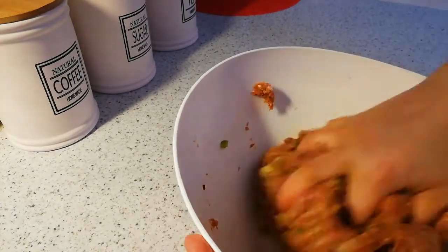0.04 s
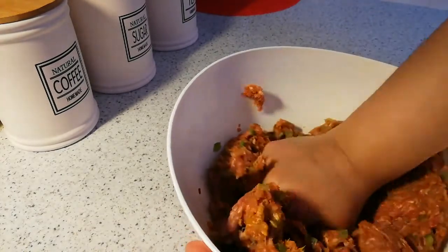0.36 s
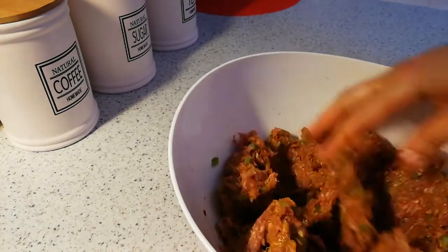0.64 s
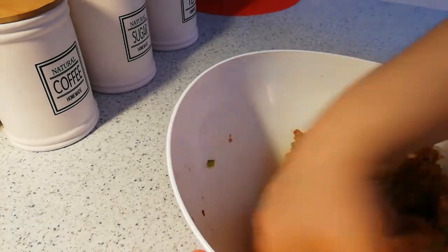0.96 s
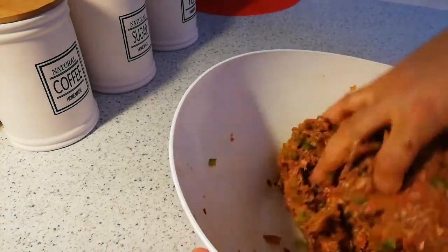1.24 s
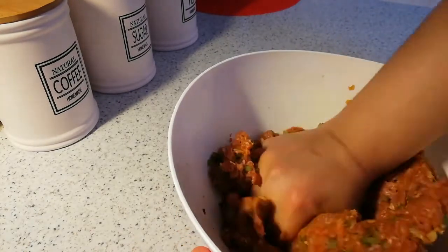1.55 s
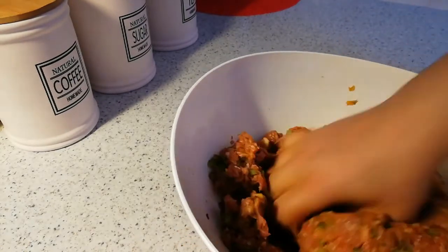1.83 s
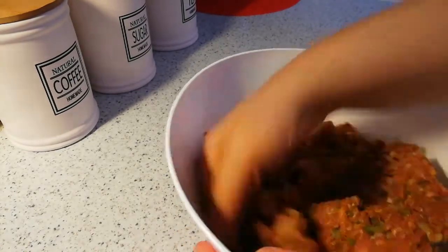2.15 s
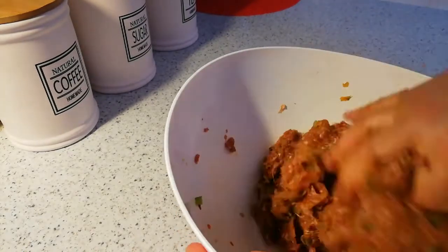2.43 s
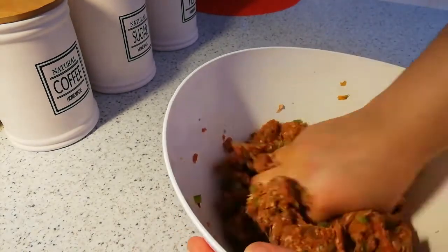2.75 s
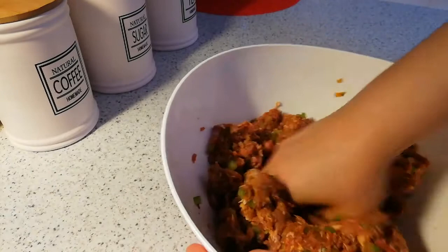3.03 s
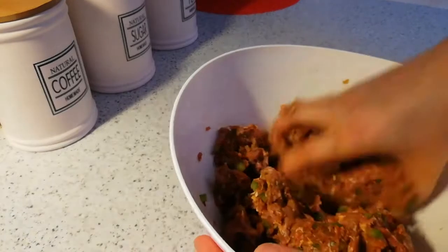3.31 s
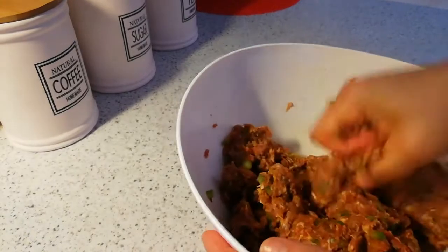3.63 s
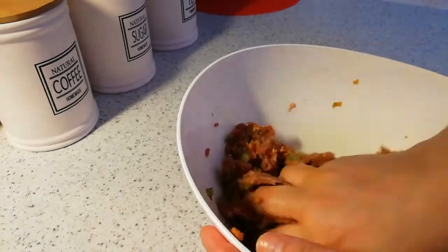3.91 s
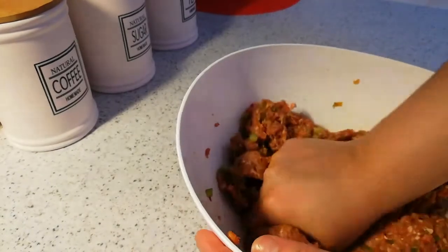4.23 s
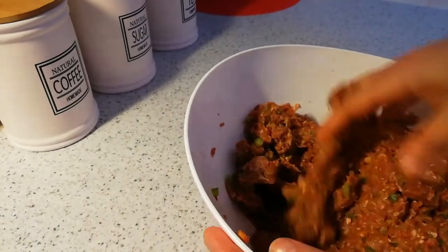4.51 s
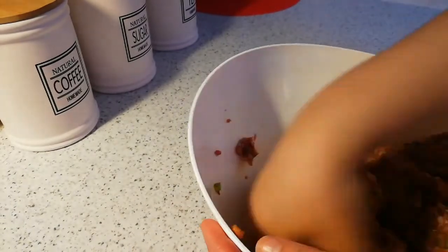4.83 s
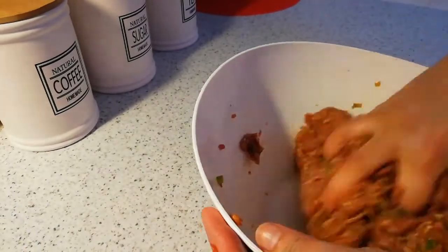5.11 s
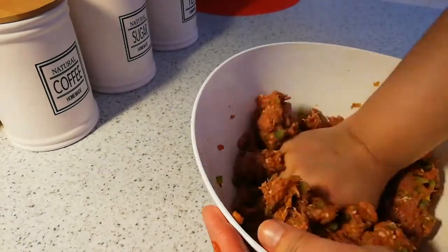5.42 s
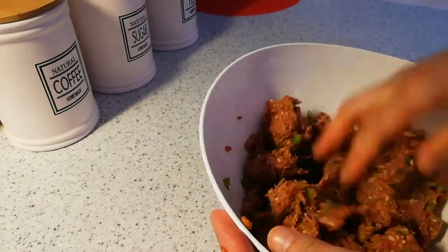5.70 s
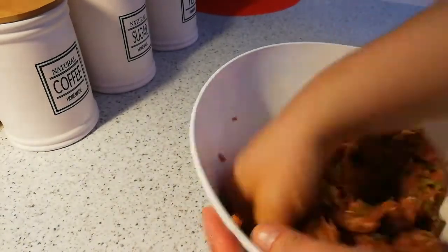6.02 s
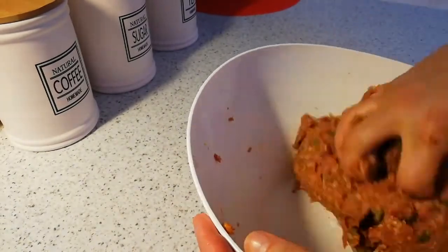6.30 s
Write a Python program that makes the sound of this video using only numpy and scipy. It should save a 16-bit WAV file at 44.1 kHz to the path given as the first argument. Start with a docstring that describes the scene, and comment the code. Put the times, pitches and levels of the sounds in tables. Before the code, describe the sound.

Close, crackly squishing and small wet pops of mince being mixed by hand, with a plastic bowl knocking and rattling against the counter.

```python
"""A small hard kitchen, the microphone close to a plastic bowl of minced meat on the counter.
Over a low steady rumble a hand kneads from the start: each squeeze fizzes and snaps as sticky films tear,
and bumps the bowl dully. From 0.4 s pushes tip the bowl, which knocks and rattles on the counter.
From 1.1 s suction lets go in small pops; from 3.4 s trapped air squelches out as well.
The kneading goes on to the end, the kitchen answering each knock with a short tail."""
import sys
import numpy as np
from scipy import signal
from scipy.fft import rfft, irfft, next_fast_len
from scipy.io import wavfile
from scipy.ndimage import uniform_filter1d, map_coordinates

SR = 44100
rng = np.random.default_rng(int(sys.argv[2]) if len(sys.argv) > 2 else 0)


def wrap_up_sound(samples):
    """Save the sound to the file named by the first command line argument, as 16-bit audio."""
    columns = np.atleast_2d(samples).T
    # keep every value between -1 and 1, then stretch to whole-number steps
    tamed = np.clip(columns, -1, 1)
    steps = np.round(tamed * 32767).astype(np.int16)
    wavfile.write(sys.argv[1], SR, steps)


N = 284886


def amp(db):
    """Decibels to gain."""
    return 10 ** (np.asarray(db) / 20)


def unit(x):
    """Scale to rms 1."""
    return x / np.sqrt(np.mean(x ** 2) + 1e-20)


def along(points, hz):
    """Read a (frequency_hz, value) curve on a log frequency axis."""
    point_hz, values = np.transpose(points)
    return np.interp(np.log(hz + 1), np.log(point_hz + 1), values)


def wobble(knots_per_s):
    """A smooth random curve."""
    knots = rng.standard_normal(int(N * knots_per_s / SR) + 4)
    return map_coordinates(knots, [np.arange(N) * knots_per_s / SR])


def filtered(x, response):
    """Filter x by a gain that is a function of frequency."""
    n = x.shape[-1]
    padded = next_fast_len(n + 8192)
    return irfft(rfft(x, padded) * response(np.fft.rfftfreq(padded, 1 / SR)), padded)[..., :n]


def coloured(x, spectrum):
    """Give x a (frequency_hz, gain_db) colour."""
    return filtered(x, lambda hz: amp(along(spectrum, hz)))


def add(track, start_s, sound):
    """Mix a stereo sound into track."""
    part = track[:, max(round(start_s * SR), 0):][:, :sound.shape[1]]
    part += sound[:, :part.shape[1]]


# How alike diffuse sound is at the microphone's left and right ports: frequency_hz, correlation
PORT_LIKENESS = [(100, 0.99), (250, 0.76), (600, 0.046), (3000, 0.16)]

def diffuse(size):
    """Noise from all round the microphone: alike in the bass, nearly unrelated in the treble."""
    def mid_side_gains(hz):
        angle = np.arccos(np.clip(along(PORT_LIKENESS, hz), -1, 1)) / 2
        return np.array([np.cos(angle), np.sin(angle)])
    mid, side = filtered(rng.standard_normal((2, size)), mid_side_gains)
    return np.array([mid + side, mid - side])


# The kitchen's reverberation: frequency_hz, t60_s
KITCHEN_DECAY = [(150, 0.5), (800, 0.42), (2000, 0.35), (5000, 0.71), (14000, 0.39)]

def path_to_mic(near_db, near_t60, room_db, lag_s=0.00023):
    """Bowl to microphone: the direct sound, a near scatter off jars and counter, the kitchen's tail."""
    t = np.arange(SR // 3) / SR
    near = diffuse(len(t)) * amp(-60 * t / near_t60) * (t > .0012)
    hz, frame_s, bands = signal.stft(diffuse(len(t)), SR, nperseg=256)
    bands = bands * amp(-60 * frame_s / along(KITCHEN_DECAY, hz)[:, None])
    tail = signal.istft(bands, SR, nperseg=256)[1][:, :len(t)] * (t > .006)
    response = (amp(near_db) * unit(near) + amp(room_db) * unit(tail)) / np.sqrt(len(t))
    response[0, round(lag_s * SR)] += 1  # the bowl stands to the right, so the left port hears it later
    response[1, 0] += 1
    return response


# The kitchen's background: frequency_hz, gain_db
ROOM_TONE_SPECTRUM = [(20, -1.5), (55, 1.5), (120, -2.5), (220, -11.5), (400, -17), (580, -18.5),
                      (1000, -38), (3000, -72), (16000, -21)]

def room_tone(level_db=-58):
    """A steady low rumble and faint hiss all round the microphone."""
    return amp(level_db) * unit(coloured(diffuse(N), ROOM_TONE_SPECTRUM))


# The hand gathers, presses and lets go: start_s, firmest_s, end_s, films_db, air_over_films_db
HAND_SQUEEZES = [(-0.04, 0.111, 0.28, -44, -10), (0.305, 0.352, 0.47, -43, -10),
                 (0.693, 0.782, 0.89, -48.5, -5.5), (0.903, 1.034, 1.16, -52.5, -15),
                 (1.244, 1.43, 1.592, -44.5, -14.5), (1.641, 1.678, 1.808, -43.5, -5),
                 (2.016, 2.087, 2.2, -49, -10), (2.3, 2.469, 2.46, -55, -21), (2.506, 2.752, 2.86, -45, -9),
                 (2.919, 2.978, 3.055, -42, -11), (3.276, 3.423, 3.576, -43, -11),
                 (3.62, 3.66, 3.8, -47.5, -8.5), (3.862, 3.978, 4.057, -46, -5),
                 (4.084, 4.101, 4.14, -46, -6.5), (4.187, 4.285, 4.366, -45, -28),
                 (4.397, 4.46, 4.49, -58.5, -22), (4.57, 4.69, 4.76, -51, -2), (4.8, 4.87, 4.96, -51.5, -1),
                 (4.96, 5.105, 5.13, -51.5, -14), (5.122, 5.22, 5.35, -44.5, -23),
                 (5.475, 5.503, 5.6, -41.5, -7), (5.842, 5.903, 6.027, -48, -7),
                 (6.084, 6.12, 6.26, -47, -13), (6.273, 6.47, 6.38, -48.5, -9.5)]

def squeezing(swell_db=8, ease_db=6.5, roundness=1.37, grip_db_per_s=319, release_db_per_s=277):
    """Levels in dB of tearing films and escaping air as the hand grips, presses, eases and lets go."""
    t = np.arange(N) / SR
    films_power, air_power = amp(-68) ** 2, amp(-71.5) ** 2  # the meat settling between squeezes
    for start_s, firmest_s, end_s, films_db, air_over_films_db in HAND_SQUEEZES:
        early = np.clip((firmest_s - t) / max(firmest_s - start_s, 1 / SR), 0, 1)
        late = np.clip((t - firmest_s) / max(end_s - firmest_s, 1 / SR), 0, 1)
        level_db = films_db - swell_db * early ** roundness - ease_db * late ** roundness
        level_db -= grip_db_per_s * np.maximum(start_s - t, 0)
        level_db -= release_db_per_s * np.maximum(t - end_s, 0)
        films_power += amp(level_db) ** 2
        air_power += amp(level_db + air_over_films_db) ** 2
    return 10 * np.log10(films_power), 10 * np.log10(air_power)


def crackle(spectrum, per_s, spread_db, wash_db):
    """Tiny ruptures at random moments and spots; their echoes off the bowl merge into a wash."""
    when, spot, sign = rng.random((3, int(per_s * N / SR)))
    size = amp(spread_db * np.clip(rng.standard_normal(len(when)), -3, 3)) * np.sign(sign - .5)
    lag_s = .0008 * spot  # each spot has its own delay between the ports
    direct = np.array([np.bincount((when * N + s * SR).astype(int), size, N)[:N] for s in (lag_s, 0)])
    echo_power = signal.lfilter([1], [1, -np.exp(-1 / (0.013 * SR))], direct[1] ** 2)
    wash = np.sqrt(echo_power) * diffuse(N)
    return unit(coloured(unit(direct) + amp(wash_db) * unit(wash), spectrum))


def patchy(x, depth_db):
    """Small random patches of the fizz's spectrum swell and fade, giving it an uneven, mottled colour."""
    bands = signal.stft(x, nperseg=256)[2]
    patches = uniform_filter1d(rng.standard_normal(bands.shape[1:]), size=4, axis=0)  # across frequency
    patches = uniform_filter1d(patches, size=6, axis=1)  # across time
    gain = amp(depth_db * np.clip(unit(patches), -2, 2))
    return unit(signal.istft(bands * gain, nperseg=256)[1][:, :N])


# The bright fizz of wet films, heard close: frequency_hz, gain_db
FILM_SPECTRUM = [(300, -38), (550, -26), (900, -7.5), (1700, -2), (3000, 0.5), (6000, -2), (9000, -1),
                 (16000, -1)]
# The duller crackle of air pockets: frequency_hz, gain_db
POCKET_SPECTRUM = [(300, -10), (650, -14), (880, -5.5), (1150, -2), (1400, -5), (1700, -4.5), (3000, -23)]

def meat_fizz(tearing_db, air_db):
    """Squeezing tears wet films in clumps and presses air out of pockets."""
    clumps = amp(tearing_db + 1.7 * wobble(50) + 0.73 * wobble(350))
    films = crackle(FILM_SPECTRUM, per_s=3200, spread_db=3.5, wash_db=1.5)
    films = patchy(films, depth_db=2.4)
    pockets = crackle(POCKET_SPECTRUM, per_s=2000, spread_db=3, wash_db=0) * amp(2 * wobble(35))
    return clumps * films + amp(air_db) * pockets


def struck_bowl(modes, path, attack_s):
    """A blow rings the modes at fresh strengths; heard along path, rms 1 over the first 30 ms."""
    t = np.arange(SR // 5) / SR
    hz, db, t60 = np.transpose(modes)[:, :, None]
    detune, strength_db = rng.standard_normal((2, len(modes), 1))
    hz = hz * (1 + .01 * detune)  # the meat shifts its weight between blows
    ring = np.sum(amp(db + strength_db - 60 * t / t60) * np.sin(2 * np.pi * hz * t), axis=0)
    bass_cut = signal.butter(2, .7 * hz.min(), "high", fs=SR)  # little radiates below the lowest mode
    ring = signal.lfilter(*bass_cut, ring * (1 - np.exp(-t / attack_s)))
    heard = signal.fftconvolve(ring[None], path, axes=1)
    return heard / np.sqrt(np.mean(heard[:, :round(.03 * SR)] ** 2))


# The loaded bowl bouncing on its foot: pitch_hz, gain_db, t60_s
FOOT_MODES = [(140, -10.5, 0.11), (204, 8, 0.022), (224.2, -7, 0.12), (288, -8, 0.04)]
# A lump of meat flops onto the bowl's floor: start_s, level_db
MEAT_FLOPS = [(0.813, -49.5), (0.841, -51), (2.471, -57), (3.176, -41), (4.558, -48.5), (5.965, -39.5)]

def thuds(press_over_films_db=-21):
    """Flopping meat and the firmest moment of each squeeze softly bounce the bowl on its foot."""
    out = np.zeros((2, N))
    presses = [(firmest_s, db + press_over_films_db) for _, firmest_s, _, db, _ in HAND_SQUEEZES]
    for start_s, level_db in MEAT_FLOPS + presses:
        path = path_to_mic(near_db=1.5, near_t60=0.12, room_db=-5.5)
        add(out, start_s, amp(level_db) * struck_bowl(FOOT_MODES, path, attack_s=0.0039))
    return out


# A snap heard close: frequency_hz, gain_db
SNAP_SPECTRUM = [(500, -23), (1500, -4.5), (4000, -7.5), (9000, -2.5), (16000, 1.5)]

def snap(t60, spray_db, spray_t60):
    """A sharp, bright spit with a brief spray after it."""
    t = np.arange(SR // 12) / SR
    envelope = amp(-60 * t / t60) + amp(spray_db - 60 * t / spray_t60)
    return envelope * unit(coloured(rng.standard_normal((2, len(t))), SNAP_SPECTRUM))


# The loudest snaps of sticky meat off skin and plastic: start_s, level_db (before trim_db)
LOUD_SMACKS = [(0.2492, -33), (0.252, -30), (0.338, -28), (1.501, -28.5), (1.509, -27.5), (1.545, -28),
               (2.7953, -34.5), (2.918, -38), (2.9745, -30), (2.9946, -32.5), (3.3077, -30), (3.4651, -32),
               (4.052, -44), (4.105, -46), (5.152, -35.5), (5.335, -39.5)]

def smacks(tearing_db, trim_db=3, lesser_per_s=9, lift_db=5, scatter_db=2.5):
    """Films snap: a few loud ones, and lesser ones at random that follow the squeeze's strength."""
    out = np.zeros((2, N))
    lesser = [(when * N / SR, tearing_db[int(when * N)] + lift_db + scatter_db * (2 * strength - 1))
              for when, strength in rng.random((int(lesser_per_s * N / SR), 2))]
    for start_s, level_db in LOUD_SMACKS + lesser:
        add(out, start_s, amp(level_db + trim_db) * snap(t60=0.0046, spray_db=-11, spray_t60=0.078))
    return out


def base_slap(hz, lag_s=0.00073):
    """The bowl's base claps out the air under it in a single cycle; peak 1, later at the left port."""
    t = np.arange(SR // 100) / SR - np.array([[lag_s], [0]])
    phase = 2 * np.pi * hz * t - np.pi
    return -phase * np.exp((1 - phase ** 2) / 2)


# The bowl meets the counter; a harder landing is higher in pitch:
# start_s, clack_db, rim_over_clack_db, pitch_hz, rebounds
BOWL_LANDINGS = [(0.433, -26.5, -9, 716, False), (0.621, -46.5, 6.5, 600, True),
                 (0.693, -49, 5.5, 600, False), (0.741, -49, -7, 410, False),
                 (1.757, -29.5, -9, 718, False), (1.933, -58.5, 1, 760, False),
                 (1.948, -53, 10, 806.4, True), (2.005, -49.5, 9.5, 530, False),
                 (2.108, -40.5, 1, 850, False), (3.078, -31.5, -7.5, 576, False),
                 (3.146, -55, 4, 700, False), (3.573, -34, -1, 536, False), (3.633, -34, -13, 493.5, False),
                 (3.771, -52, 8, 860, False), (3.837, -31, -8.5, 497, False),
                 (4.515, -55.5, 11, 800, False), (4.702, -37.5, -9, 594, False),
                 (4.721, -54, 6, 770, False), (4.751, -28.5, -12, 560, False),
                 (4.942, -37, -14.5, 520, False), (5.614, -24, -8.5, 890, False),
                 (5.778, -51, 4, 660, False), (5.79, -45.5, 3, 773, False),
                 (5.829, -48.5, 6.5, 726.3, False), (5.928, -48, -2, 446, False),
                 (5.965, -38.5, -17, 445, False), (6.013, -41.5, -13, 635, True)]

def contacts(rebound_s=0.0165, loss_db=1.5):
    """Every touch of bowl on counter; a rocking bowl touches down a second time, more softly."""
    for start_s, clack_db, rim_over_clack_db, pitch_hz, rebounds in BOWL_LANDINGS:
        rim_db = clack_db + rim_over_clack_db
        yield start_s, clack_db, rim_db, pitch_hz
        if rebounds:
            yield start_s + rebound_s, clack_db - loss_db, rim_db - loss_db, pitch_hz


# The bowl's plastic wall: pitch_hz, gain_db, t60_s
WALL_MODES = [(413.4, -13.5, 0.078), (472.5, -5, 0.026), (594, -18.5, 0.063), (659, -24.5, 0.048),
              (737, 1.5, 0.0078), (797, -17.5, 0.063), (896, -12, 0.042), (977, 3, 0.011),
              (1507, 6, 0.0086)]
# The bowl's rim: pitch_hz, gain_db, t60_s
RIM_MODES = [(1735, -2.5, 0.0097), (1936, 11, 0.0047), (2270, 3.5, 0.0069), (2536, 4, 0.005),
             (3040, 4, 0.0029), (5300, -4, 0.0034)]

def bowl_knocks(thump_pivot_db=-42.5, thump_growth=0.55, thump_db_per_octave=4.5, focus_db=5):
    """Flat landings slap, thump and clack; glancing ones mostly ring the rim and click."""
    out = np.zeros((2, N))
    t = np.arange(SR // 50) / SR
    for start_s, clack_db, rim_db, pitch_hz in contacts():
        thump_db = thump_pivot_db + thump_growth * (clack_db - thump_pivot_db)
        thump_db += thump_db_per_octave * np.log2(pitch_hz / 600)  # a harder landing thumps more
        # the higher the modes, the straighter they aim at the microphone
        foot_path = path_to_mic(near_db=1, near_t60=0.073, room_db=-6)
        wall_path = path_to_mic(near_db=-1, near_t60=.045, room_db=-5.5, lag_s=.0006)
        rim_path = path_to_mic(near_db=-3, near_t60=.025, room_db=-10, lag_s=.0006)
        thump = amp(thump_db) * struck_bowl(FOOT_MODES, foot_path, attack_s=0.00076)
        # the landing favours wall modes near its pitch
        wall = [(hz, db - focus_db * np.log2(hz / pitch_hz) ** 2, t60) for hz, db, t60 in WALL_MODES]
        clack = amp(clack_db - 2) * struck_bowl(wall, wall_path, attack_s=0.0006)
        # each spot of contact has its own colour
        rim = [(hz, db + rng.normal(0, 1.9), t60) for hz, db, t60 in RIM_MODES]
        rim_ring = amp(rim_db - 1) * struck_bowl(rim, rim_path, attack_s=0.0007)
        add(out, start_s, thump + clack + rim_ring)
        add(out, start_s + 0.00038, amp(clack_db + 13.5) * base_slap(1.236 * pitch_hz))
        tick = rng.standard_normal(len(t)) * amp(-60 * t / 0.01)  # the hard contact itself
        add(out, start_s, amp(rim_db - 6) * signal.fftconvolve(tick[None], rim_path, axes=1))
        if rim_db > clack_db:  # a glancing landing
            add(out, start_s, amp(rim_db + 2) * snap(t60=0.0037, spray_db=-10, spray_t60=0.042))
    return out


# Cavities opening in the meat: start_s, peak_db (before trim_db), pitch_hz
CAVITY_POPS = [(1.106, -46.5, 1060), (1.141, -26, 1830), (1.211, -38, 1090), (3.799, -33, 1040),
               (4.516, -29.5, 2260), (5.027, -29.5, 1580), (5.918, -32, 1242), (5.937, -25, 1790),
               (6.134, -34.5, 1340), (6.148, -30, 1360)]

def suction_pops(trim_db=-3, t60=0.006, rise=2):
    """Suction lets go and a cavity rings briefly, its pitch rising slightly as it opens."""
    out = np.zeros((2, N))
    t = np.arange(SR // 20) / SR
    envelope = amp(-60 * t / t60) * (1 - np.exp(-t / 0.00067))
    for start_s, peak_db, pitch_hz in CAVITY_POPS:
        ring = envelope * np.sin(2 * np.pi * pitch_hz * t * (1 + rise * t))
        path = path_to_mic(near_db=0.5, near_t60=0.034, room_db=-6.5)
        heard = signal.fftconvolve(ring[None], path, axes=1)
        add(out, start_s + 0.000795, amp(peak_db + trim_db) * heard / np.abs(heard).max())
    return out


# Trapped air burbles out of the mince: start_s, length_s, level_db, first_hz, last_hz
AIR_SQUELCHES = [(3.382, 0.13, -55, 1300, 955), (4.204, 0.087, -57, 897, 1807),
                 (4.615, 0.093, -52, 1700, 1650), (5.135, 0.21, -52.5, 1105, 1558),
                 (5.465, 0.11, -51.5, 1054, 1451)]

def squelches(width_hz=210):
    """Air passes through a gap that changes size, ringing it in a narrow, gliding band."""
    out = np.zeros((2, N))
    for start_s, length_s, level_db, first_hz, last_hz in AIR_SQUELCHES:
        size = round(length_s * SR)
        progress = np.linspace(0, 1, size)
        flutter = filtered(rng.standard_normal(size), lambda hz: 1 / (1 + (hz / width_hz) ** 2))
        pitch_hz = first_hz * (last_hz / first_hz) ** progress
        swell = np.sqrt(progress * (1 - progress))
        ring = swell * flutter * np.sin(2 * np.pi * np.cumsum(pitch_hz) / SR)
        path = path_to_mic(near_db=7, near_t60=0.018, room_db=-12)
        heard = signal.fftconvolve(unit(ring)[None], path, axes=1)
        add(out, start_s, amp(level_db) * heard / np.sqrt(np.sum(heard ** 2) / (2 * size)))
    return out


def scene():
    """Meat and bowl close up and a little to the right, with the kitchen around them."""
    tearing_db, air_db = squeezing()
    meat = meat_fizz(tearing_db, air_db) + smacks(tearing_db) + squelches() + suction_pops()
    bowl = bowl_knocks() + thuds()
    return meat + bowl + room_tone()


# Response of the microphone's left and right ports: frequency_hz, gain_db
LEFT_RESPONSE = [(200, 0.5), (700, 3.5), (1300, -1), (8000, 4), (9500, 4), (11500, -6), (15500, -12)]
RIGHT_RESPONSE = [(200, 1), (700, 8.5), (1300, 0.5), (8000, 5), (10000, 5.5), (12000, 9), (13500, 0),
                  (15500, -5.5)]

def record(dry, top_hz=15900):
    """A camera's stereo microphone: each port has its own colour, and nothing passes above top_hz."""
    ports = np.array([coloured(dry[0], LEFT_RESPONSE), coloured(dry[1], RIGHT_RESPONSE)])
    return filtered(ports, lambda hz: hz < top_hz)


dry = scene()
out = record(dry)
wrap_up_sound(out)
```